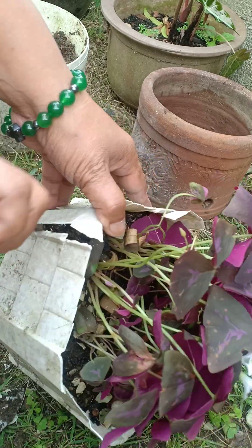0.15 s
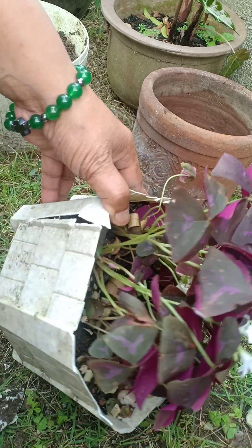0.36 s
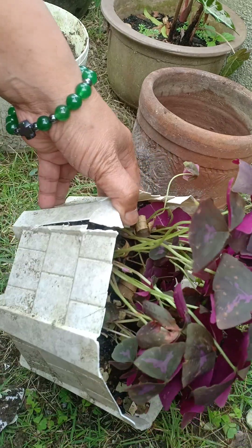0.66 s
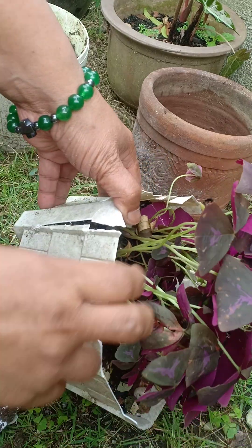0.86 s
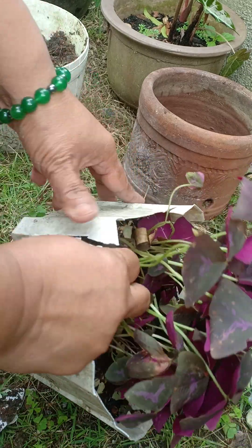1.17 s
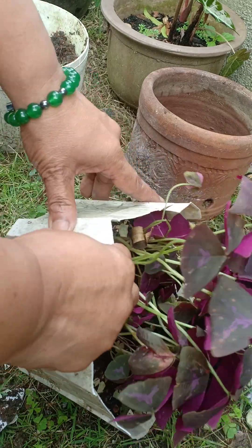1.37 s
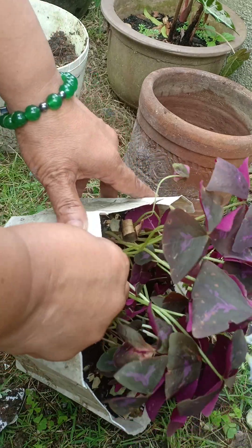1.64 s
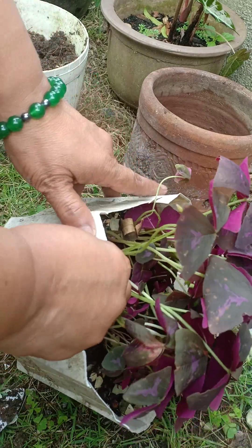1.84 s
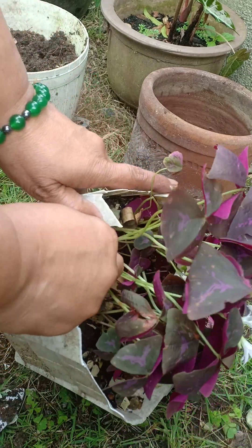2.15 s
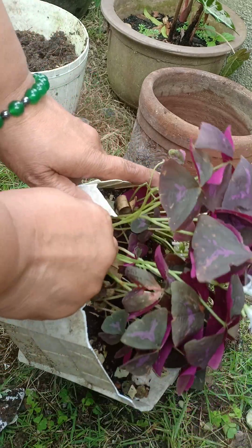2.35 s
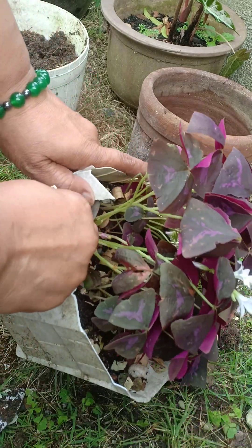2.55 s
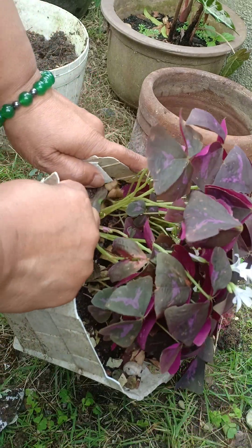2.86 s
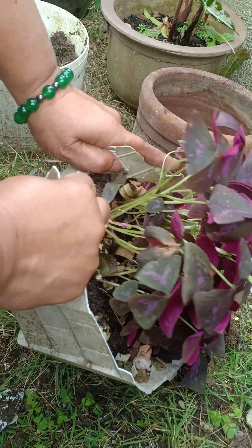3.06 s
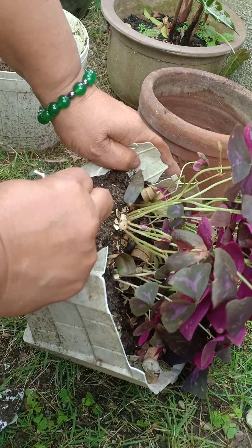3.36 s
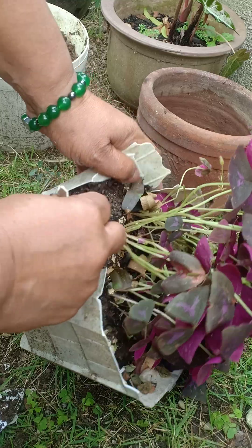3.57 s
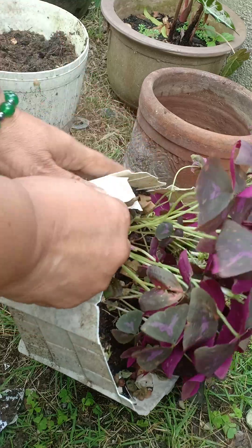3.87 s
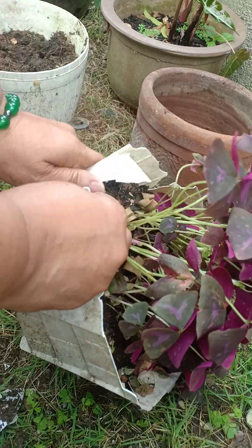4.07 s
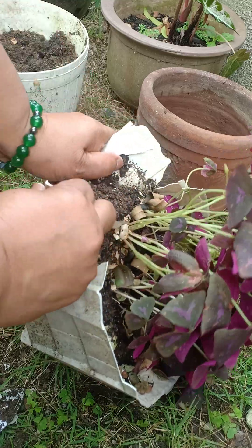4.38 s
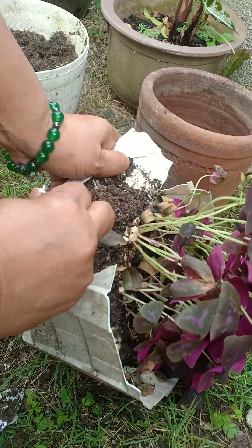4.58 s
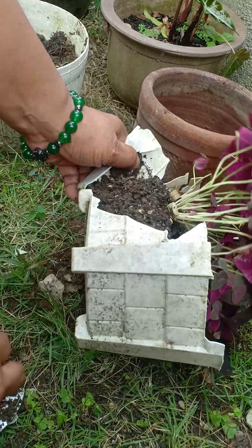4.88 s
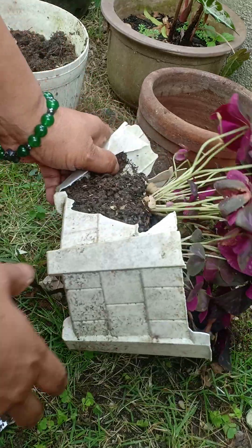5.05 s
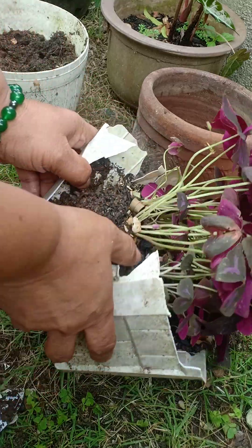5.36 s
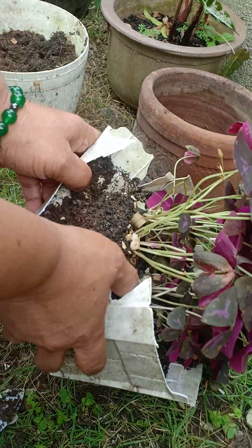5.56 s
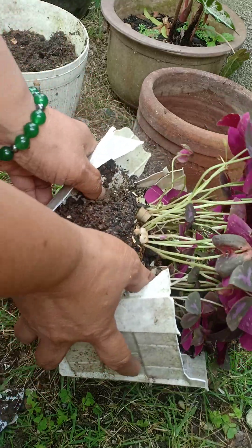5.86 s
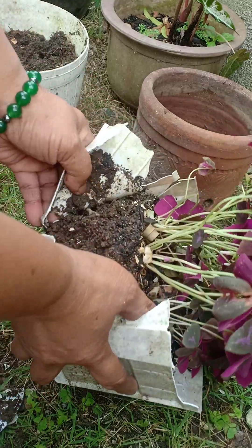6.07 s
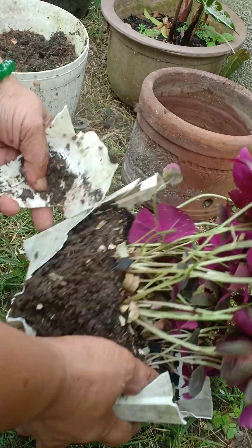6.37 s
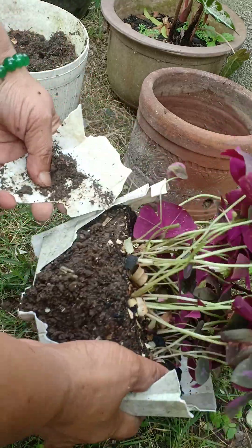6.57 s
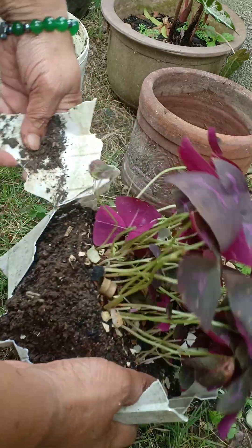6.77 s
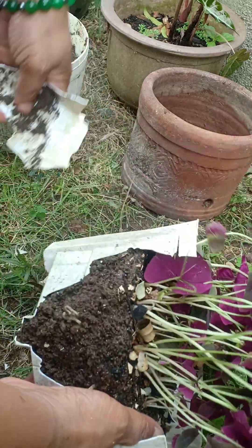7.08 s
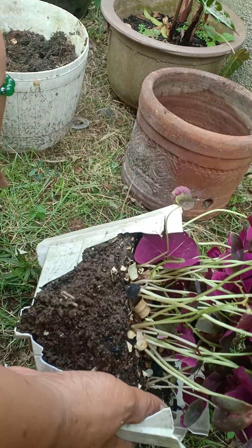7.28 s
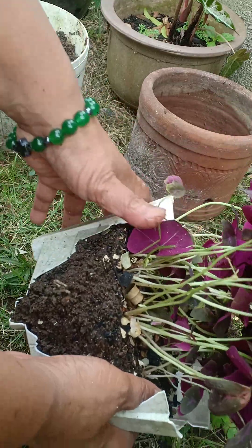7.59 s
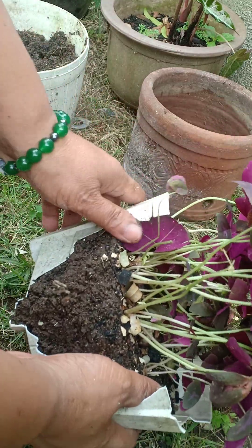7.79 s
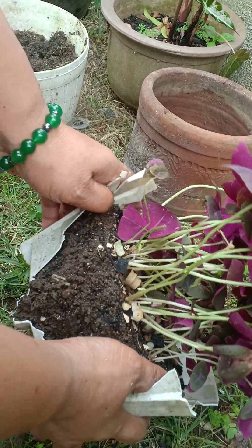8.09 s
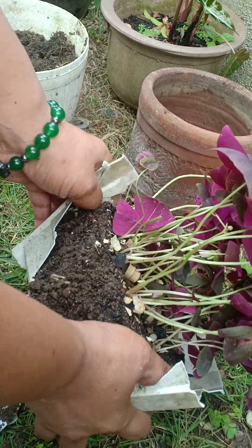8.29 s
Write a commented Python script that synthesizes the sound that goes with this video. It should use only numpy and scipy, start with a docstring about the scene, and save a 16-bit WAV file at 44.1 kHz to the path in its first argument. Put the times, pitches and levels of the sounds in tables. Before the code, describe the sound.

A brittle plastic planter is pulled apart by hand on a lawn, about half a metre from the microphone. Quick runs of small cracks come first, then several loud, sharp snaps through the middle and later part, one a double snap with a low thud. Between them soil and leaves rustle softly and crumbs tick on the plastic. Far off, traffic rumbles and a machine hums steadily.

```python
"""A brittle plastic planter is pulled apart by hand on a lawn, half a metre away, in stereo.
Each fracture, single or in a quick run, releases stored strain as bending waves that the soil damps.
One double snap has a low thud and leaves a rough 5 kHz ringing. Crumbs tick on impact, edges squeak
early on, and edges, soil and leaves rustle. The yard scatters a faint tail; far off, a machine hums and
traffic rumbles. The level dips briefly ahead of two breaks; a limiter ducks around the loudest snaps."""
import sys
import numpy as np
from scipy import signal
from scipy.fft import rfft, irfft
from scipy.io import wavfile
from scipy.ndimage import uniform_filter1d, minimum_filter1d

SR = 44100
rng = np.random.default_rng(int(sys.argv[2]) if len(sys.argv) > 2 else 0)


def output_pcm(signal):
    """Save a mono or channel-first signal as 16-bit PCM at the path in sys.argv[1].

    Samples are clipped to [-1, 1] before scaling.
    """
    pcm = np.clip(np.atleast_2d(signal).T, -1, 1) * 32767
    wavfile.write(sys.argv[1], SR, np.round(pcm).astype(np.int16))


N = 371763

# fractures of the wall: (time [s], strength [dB], resonance of the flexing piece [Hz],
# ring of the fresh edge [Hz], brightness near 5 kHz [dB], left minus right [dB], t60 [s])
CRACKS = [(.033, 0, 1420, 5630, -11, 2, .035), (.054, -7, 900, 5200, 4.5, 0, .014),
          (0.1135, 5, 2100, 5300, -2, 2, 0.034), (0.1262, 11.5, 980, 6000, -6, -0.5, 0.046),
          (0.2935, 10.5, 1940, 1460, -7.5, -2.5, 0.031), (.467, -6.5, 800, 4500, 13.5, 0.5, 0.029),
          (.8085, 7.5, 2220, 4080, 13.5, 6, 0.029), (0.8148, 10.5, 2100, 5760, 1, 3, 0.055),
          (.821, 2, 2000, 5820, 9, -2, 0.04), (.832, 5, 3900, 5340, -5, 2, 0.065),
          (0.841, 7, 2440, 3530, 13.5, 5.5, 0.031), (.922, 7.5, 2500, 4890, 1.5, 4, 0.031),
          (0.9354, -3, 2310, 4860, -1, 23, 0.046), (0.9494, 2, 2110, 4930, 0, 2, 0.029),
          (1.028, -6, 1700, 4800, -7, 8, .02), (1.187, 3, 945, 3920, -7.5, 0, 0.073),
          (1.812, 0, 1310, 4960, -4.5, -2, 0.053), (2.054, 9.5, 1000, 1290, -7.5, 1, 0.023),
          (3.083, 27.5, 1160, 3820, -3.5, 0, 0.015), (3.222, 4, 535, 5610, -9.5, -2, 0.016),
          (3.3379, 15.5, 1290, 2620, 2, .5, 0.012), (3.535, 1, 1960, 5600, 1, 1.5, .011),
          (3.55, 29.5, 1080, 2640, 3.5, 0.5, 0.0071), (3.561, 15, 2920, 2580, 0, -0.5, .026),
          (4.289, -0.5, 1740, 3340, -3, 0, 0.087), (4.303, -8.5, 1750, 4500, 5, 0, 0.027),
          (4.735, 27, 1700, 5370, 3.5, 0.5, 0.024), (4.793, 28, 2750, 2540, 3, 0, 0.017),
          (5.076, 3, 1970, 5080, -6, 0, 0.026), (5.0851, 9, 1830, 5340, 0, 1.5, 0.01),
          (5.159, 5.5, 1720, 5800, -2, -3, 0.013), (5.219, -6.5, 1193, 5630, -4, 0, 0.019),
          (5.305, -1, 2207, 3410, -8, -2.5, 0.031), (5.817, -10, 2400, 3840, 4, 4.5, 0.026),
          (5.986, -10, 2147, 4860, 2, 2, .02), (6.375, 14, 2840, 5200, 6, -6.5, 0.024),
          (6.3894, 17, 2600, 5080, 5, 0.5, 0.029), (6.739, -3.5, 2450, 5500, 1, 4, 0.017),
          (6.819, -1, 1040, 5000, -7.5, 0, .039), (6.9664, 25, 1144, 5570, -4, -2, 0.021),
          (6.977, 15, 1048, 5030, -7, 1, 0.034), (7.088, -2, 890, 3330, -11, 2, .029),
          (7.213, -4, 1870, 3900, -9, -3, 0.026), (7.395, -5, 856, 6400, 1, -2, 0.048),
          (8.216, -12, 1500, 4950, -4, 1.5, .035), (8.412, -12, 2300, 5350, -1.5, 0, .02)]
# response of the thin wall to a fracture: (frequency [Hz], gain [dB])
WALL_COLOUR = [(60, -29), (180, -24.5), (280, -9), (450, -5), (700, -9), (1300, -13), (2600, -6),
               (3700, -11.5), (5500, -8), (6400, -12), (7300, -19.5), (9000, -25), (15500, -24)]
# modes of the wall, damped by the soil: (frequency [Hz], relative level [dB], t60 [s])
WALL_MODES = [(286, -3, 0.058), (459, -2.5, 0.032), (888, 5.5, 0.01), (1190, 4.5, 0.025), (1623, 3, .022),
              (2593, 5.5, 0.012), (3660, 2.5, .018), (4940, 8, .016), (5636, 7, 0.0164)]
# chips and soil striking the plastic: (time [s], strength [dB], pitch [Hz], left minus right [dB])
CRUMBS = [(.028, -17, 2520, 4), (.09, -20, 5500, -1), (.142, -28, 1690, -2), (.47, -20, 1800, -1),
          (.872, -23, 4500, 5), (3.041, -21.5, 5400, 0), (3.405, -25, 5430, 2), (3.801, -20, 2230, -2),
          (4.094, -22.5, 1906, -2), (4.558, -23, 5550, 0), (4.685, -18, 5600, -2), (4.931, -14, 1620, 3),
          (4.938, -15, 2220, 2), (4.974, -17, 2750, -5), (5, -12, 2040, 1), (5.021, -13, 2100, 1),
          (5.031, -15.5, 5200, 2), (5.057, -24, 2270, -2), (5.114, -18, 5190, 2), (5.126, -13, 2180, 1),
          (5.183, -22.5, 5400, 4), (5.875, -25, 5660, 1), (5.931, -31, 2203, -12), (6.606, -20.5, 2016, 9),
          (6.62, -15.5, 4880, -2), (6.66, -22, 4830, 2), (6.728, -24, 2180, 0), (6.81, -21, 2520, -4),
          (6.853, -22, 5180, -4), (6.897, -14.5, 1620, -2), (7.995, -22, 2430, -1.5),
          (8.109, -26.5, 5000, -3), (8.12, -30, 5200, -3), (8.156, -28, 5200, 0)]
# response of the plastic to a crumb: (frequency [Hz], gain [dB])
CRUMB_COLOUR = [(200, -12.5), (800, -3.5), (1600, 7), (3700, -1), (5500, -7), (7500, -12), (10000, -20.5),
                (15500, -17.5)]
# three squeaks of edge on edge, then at 6.395 s the rough 5 kHz ringing after the double snap:
# (start [s], length [s], pitch [Hz], level [dB], frequency jitter [ratio])
ROUGH_TONES = [(.631, .012, 4810, -51.5, .05), (.978, .014, 4830, -55, .05), (.998, .014, 4780, -55, .05),
               (6.395, .1, 5100, -58, 0.17)]
# rustles of edges, soil and leaves, except the row at 6.373 s, the low thud of the snap at 6.375 s:
# (start [s], length [s], level [dB], tilt [dB/octave], body at 600 Hz [dB], fizz [dB])
GRAINY_BURSTS = [(0, 0.35, -56.5, -4.5, 5, -4), (.847, .19, -54, 7, -2, -5), (1.26, 0.086, -57, 1, 0, -1),
                 (1.41, 0.097, -56.5, 0.5, 0, 3.5), (1.53, .06, -63, 3, 0, -1),
                 (2.827, 0.055, -56, 3, -9, 3.5), (3.102, 0.084, -52, -2.5, -1, 0),
                 (3.684, 0.086, -57, -2, 0, -2), (3.795, 0.14, -58.5, 0, 3.5, 9),
                 (3.941, 0.14, -63.5, 3, 1, 4), (4.211, 0.066, -57, 0, 3.5, -3.5),
                 (4.362, .06, -61, 6, 3.5, -0.5), (4.815, 0.16, -54.5, 1, 5, 2.5),
                 (4.924, 0.16, -43, -1, 0, 0), (5.089, 0.21, -57.5, 0, -2, 4), (5.758, .18, -50, 0, 26, 0),
                 (5.977, .1, -62.5, 4, 0, -2), (6.373, 0.032, -39.5, -4.5, 22, 0),
                 (6.39, 0.094, -47, 0, -3, -3), (6.458, .13, -54, 0, 7, -3),
                 (6.557, 0.4, -60.5, 2.5, 10, 1), (7.033, 0.25, -58.5, -2, 1, 6),
                 (7.976, 0.18, -73, 3, 6.5, 9), (8.3, 0.23, -64.5, 3.5, 0, 3)]
# spectral envelope of those bursts: (frequency [Hz], gain [dB])
BURST_COLOUR = [(100, -22), (400, -11.5), (1100, -4), (2000, 8.5), (2800, 4.5), (3700, -2), (5400, 4.5),
                (7500, -13), (9500, -22), (15500, -14.5)]
# reverberation time of the yard: (frequency [Hz], t60 [s])
YARD_DECAY = [(200, 0.21), (1000, 1), (2500, 0.35), (5500, 0.44), (9000, 0.42), (14000, 0.99)]
# partials of the machine: (frequency [Hz], level [dB])
HUM_PARTIALS = [(62.5, -65.5), (125, -55), (283, -60), (371.5, -57.5), (500, -67.5)]
# notes of far engines: (start [s], length [s], pitch [Hz], level [dB])
ENGINE_DRONES = [(0, .95, 127, -44), (.2, .5, 285, -50), (1.6, .55, 125, -43), (2, .6, 153, -36.5),
                 (3.2, 1.5, 147, -45), (7.05, 1.4, 127, -45)]
# spectrum of the far traffic: (frequency [Hz], relative density [dB])
TRAFFIC_COLOUR = [(25, -27), (36, -16.5), (50, -20.5), (68, -1), (95, -8), (125, 5), (160, 0.5), (220, -9),
                  (320, -9.5), (430, -16), (800, -20), (1400, -26), (2650, -24), (3700, -38), (5500, -33),
                  (7500, -50), (10000, -56), (15500, -52.5)]
# likeness of the traffic in the two channels: (frequency [Hz], correlation [0-1])
TRAFFIC_COHERENCE = [(60, 0.96), (160, 0.99), (300, 0.85), (600, 0.58), (1200, 0), (3000, 0.04), (15000, 0)]
# course of the traffic's hiss: (time [s], level [dB])
HISS_LEVELS = [(0, -47.5), (.6, -49.5), (2.3, -50), (2.75, -50.5), (3.3, -50), (4.5, -51), (5.5, -53),
               (6.1, -51), (7.8, -53.5), (8.4, -53)]
# brief dips of the whole sound: (start [s], end [s], gain [dB])
DIPS = [(4.705, 4.737, -11.5), (6.348, 6.376, -11.5)]


def crack(strength_db, piece_hz, edge_hz, bright_db, pan_db, t60, gentle_below_db=17.5, large_hz=1020):
    """Brittle fracture: piece and edge resonate; a small piece that yields gently radiates less bass."""
    gentle = np.clip(2 - strength_db / gentle_below_db, 0, 1)
    octaves_smaller = np.clip(np.log2(piece_hz / large_hz), -0.3, 1)
    body_db = -0.5 - 5.5 * gentle * octaves_smaller
    fizz_db = -8 + 1.23 * bright_db + 5 * gentle
    tone = [(650, body_db), (1400, 0.0032), (2800, 0.0083),
            (4600, bright_db), (6500, bright_db), (9000, fizz_db)]

    def gain_db(hz):
        piece = resonance(hz, piece_hz, db=4.5 + 3.5 * gentle, octaves=0.55)
        edge = resonance(hz, edge_hz, db=6, octaves=0.063)
        return curve(WALL_COLOUR, hz) + curve(tone, hz) + piece + edge

    return coloured(wall_waves(t60), gain_db) * panned(strength_db, pan_db)


def wall_waves(t60, attack_s=0.00028, after_db=-20, after_t60=0.074):
    """Impulse response of a damped shell: a sharp front, scattered bending waves and ringing modes."""
    t = np.arange(4096) / SR
    front = np.zeros((2, len(t)))
    front[0, 12] = front[1, 7] = 1  # reaches the right channel first
    rise = 1 - np.exp(-t / attack_s)
    decay = amp(-60 * t / t60) + amp(after_db - 60 * t / after_t60)
    detune = rng.uniform(0.97, 1.02)  # every break leaves a wall of another size
    modes = np.zeros_like(front)
    for hz, db, mode_t60 in WALL_MODES:
        phase = rng.random((2, 1)) * min(hz / 2500, 1)
        modes += amp(db - 60 * t / mode_t60) * np.sin(2 * np.pi * (hz * detune * t + phase))
    return unit_energy(0.14 * front + scattered(rise * decay) + 0.27 * unit_energy(modes))


def scattered(envelope):
    """Diffuse field: waves from all sides, even in spectrum; long ones reach both channels alike."""
    n = len(envelope)
    left, right = rng.standard_normal((2, n)) * envelope
    side = signal.sosfilt(signal.butter(1, 800, "high", fs=SR, output="sos"), left - right)
    burst = np.array([left + right + side, left + right - side])
    power = (abs(rfft(burst)) ** 2).mean(0)
    band_db = 10 * np.log10(uniform_filter1d(power, size=41))
    whitened = coloured(burst, lambda hz: -np.interp(hz, np.fft.rfftfreq(n, 1 / SR), band_db))
    return unit_energy(whitened[:, :n])


def crumb(strength_db, pitch_hz, pan_db, t60=0.033):
    """Impact excitation: a chip or soil grain taps the plastic, which rings briefly around one pitch."""
    t = np.arange(1024) / SR
    tap = rng.standard_normal((2, len(t))) * amp(-60 * t / t60)
    gain_db = lambda hz: curve(CRUMB_COLOUR, hz) + resonance(hz, pitch_hz, db=13, octaves=0.36)
    return unit_energy(coloured(tap, gain_db, size=512)) * panned(strength_db, pan_db)


def loose_crumb(typical_db, typical_hz=3460, spread_db=2.5):
    """Random impact: force, pitch and place scatter about typical values."""
    force, octaves, side = np.clip(rng.standard_normal(size=3), -2, 2)
    pitch_hz = typical_hz * 2 ** (0.95 * min(octaves, 1))
    return crumb(typical_db + spread_db * force, pitch_hz, pan_db=2.5 * side)


def falling_crumbs(per_s=18, hard_crack_db=14.5, mean_delay_s=0.045, fade_db_per_s=79):
    """Random arrivals: crumbs fall during each grainy burst and in a fading shower after a hard crack."""
    out = np.zeros((2, N))
    for start, length, level_db, *_ in GRAINY_BURSTS:
        typical_db = -32 + 0.53 * (level_db + 61)  # louder bursts bring louder ticks
        for moment in rng.random(size=round(per_s * length)):
            add(out, start + moment * length, loose_crumb(typical_db))
    for start, strength_db, *_ in CRACKS:
        if strength_db > hard_crack_db:
            for delay in mean_delay_s * rng.exponential(size=10):
                add(out, start + delay, loose_crumb(strength_db - 50 - fade_db_per_s * delay))
    return out


def rough_tone(length, hz, level_db, jitter):
    """Line broadening: frequency jitter roughens a sine into a squeak or the ringing after a snap."""
    n = int(length * SR)
    cycles = np.cumsum(hz * (1 + jitter * rng.standard_normal(n))) / SR
    tone = np.sin(2 * np.pi * cycles) * signal.windows.hann(n)
    return unit_rms(tone) * panned(level_db, 0)


def grainy_burst(length, level_db, tilt_db, body_db, fizz_db, grains_per_s=1200, ring_cycles=2.5):
    """Shot noise: clumps of ringing grains over hiss make a rustle or, if short and low, a thud."""
    n, t = int(length * SR), np.arange(512) / SR
    pitches = np.linspace(1200, 13000, num=14)
    grains = np.zeros((2, n))
    for hz in pitches:
        onsets = rng.random(n) < grains_per_s / len(pitches) / SR
        forces = amp(3.5 * np.minimum(rng.exponential(1, n), 3))
        decay = np.sqrt(hz) * np.exp(-hz * t / ring_cycles)
        ring = decay * np.sin(2 * np.pi * (hz * t + rng.random((2, 1))))
        grains += signal.fftconvolve((onsets * forces)[None], ring, axes=1)[:, :n]
    slow_noise = unit_rms(uniform_filter1d(rng.standard_normal(n), size=300, mode="wrap"))
    clumps = amp(2.5 * np.clip(slow_noise, -2, 2))
    hiss = rng.standard_normal((2, n))
    burst = clumps * (unit_rms(grains) + hiss) * signal.windows.tukey(n, 0.4)

    def gain_db(hz):
        body = resonance(hz, 600, db=body_db, octaves=1)
        fizz = curve([(6000, 0.0011), (10000, fizz_db)], hz)
        tilt = tilt_db * np.log2(np.clip(hz, 400, 8000) / 2500)
        return curve(BURST_COLOUR, hz) + body + fizz + tilt

    return amp(level_db) * unit_rms(coloured(burst, gain_db))


def yard_tail(sound, wet_db=-24, build_s=0.0017):
    """Reverberation: pots and walls scatter the sound, and each band decays at its own rate."""
    hz, t, bands = signal.stft(rng.standard_normal((2, SR)), SR, nperseg=256)
    bands = bands * amp(-60 * t / curve(YARD_DECAY, hz)[:, None]) * (1 - np.exp(-t / build_s))
    response = unit_energy(signal.istft(bands, SR, nperseg=256)[1])
    return amp(wet_db) * signal.fftconvolve(sound, response, axes=1)[:, :N]


def machine_hum(waver_db=2):
    """Periodic vibration: a machine radiates a line spectrum, wavering in level and pitch."""
    return sum(amp(db + waver_db * drift(2.3)) * wandering_tone(hz, depth=0.0019, rate_hz=2.4)
               for hz, db in HUM_PARTIALS)


def engine_drones():
    """Periodic vibration: each far engine is heard as one note that swells and fades."""
    t, out = np.arange(N) / SR, np.zeros(N)
    for start, length, hz, db in ENGINE_DRONES:
        progress = np.clip((t - start) / length, 0, 1)
        swell = np.sqrt(abs(np.sin(np.pi * progress)))
        out += amp(db) * swell * wandering_tone(hz, depth=0.006, rate_hz=3)
    return out


def traffic(rumble_db=-38.5, recede_db_per_s=0.51, crossover_hz=450):
    """Partial coherence: a slowly receding rumble is alike in both channels; the hiss is diffuse."""
    t, hz = np.arange(N) / SR, np.fft.rfftfreq(N, 1 / SR)
    left, independent = rfft(rng.standard_normal((2, N)))
    coherence = curve(TRAFFIC_COHERENCE, hz)
    right = coherence * left + np.sqrt(1 - coherence ** 2) * independent
    spectrum = np.array([left, right]) * amp(curve(TRAFFIC_COLOUR, hz))
    low_share = 1 / (1 + (hz / crossover_hz) ** 4)
    rumble = unit_rms(irfft(spectrum * low_share, N))
    hiss = unit_rms(irfft(spectrum * (1 - low_share), N))
    rumble *= amp(rumble_db - recede_db_per_s * t + 0.98 * drift(8.2))
    hiss *= amp(np.interp(t, *np.transpose(HISS_LEVELS)) + 0.76 * drift(24))
    return rumble + hiss


def dips(ramp_s=0.0057):
    """Amplitude modulation: a gain that sinks for a moment and comes back."""
    t = np.arange(N) / SR
    return amp(sum(db * np.clip(np.minimum(t - start, end - t) / ramp_s, 0, 1)
                   for start, end, db in DIPS))


def amp(db):
    return 10 ** (np.asarray(db) / 20)


def panned(db, pan_db):
    return amp([[db + pan_db / 2], [db - pan_db / 2]])


def unit_rms(x):
    return x / np.sqrt(np.mean(x ** 2) + 1e-20)


def unit_energy(x):
    return x / np.sqrt(np.sum(x ** 2, axis=-1, keepdims=True) + 1e-20)


def curve(points, hz):
    """Linear interpolation of (frequency [Hz], value) points on a log-frequency axis."""
    point_hz, value = np.transpose(points)
    return np.interp(np.log(hz + 1), np.log(point_hz + 1), value)


def resonance(hz, centre_hz, db, octaves):
    """Resonance peak in dB, bell-shaped on a log-frequency axis."""
    return db * np.exp(-(np.log2((hz + 1) / centre_hz) / octaves) ** 2)


def coloured(x, gain_db, size=2048):
    """Minimum-phase filtering by gain_db(hz): nothing sounds ahead of a click."""
    log_gain = np.log(amp(gain_db(abs(np.fft.fftfreq(size, 1 / SR)))))
    taps = np.fft.ifft(np.exp(np.conj(signal.hilbert(log_gain)))).real
    return signal.fftconvolve(x, taps[None, :size // 2], axes=1)


def drift(rate_hz):
    """Random fluctuation of unit rms whose spectrum peaks at rate_hz."""
    speed = np.fft.rfftfreq(N, 1 / SR) / rate_hz
    return unit_rms(irfft(rfft(rng.standard_normal(N)) * speed * np.exp(-speed), N))


def wandering_tone(hz, depth, rate_hz):
    """Random frequency modulation of a sine of unit rms."""
    cycles = np.cumsum(hz * (1 + depth * drift(rate_hz))) / SR
    return np.sqrt(2) * np.sin(2 * np.pi * cycles)


def add(mix, start_s, sound):
    """Superposition of a stereo sound on the mix from start_s."""
    part = mix[:, round(start_s * SR):][:, :sound.shape[1]]
    part += sound[:, :part.shape[1]]


def scene():
    """Superposition: the planter, its reverberation and the far background, dipping together."""
    far = traffic() + (machine_hum() + engine_drones())
    planter = np.zeros((2, N))
    for table, source in ((CRACKS, crack), (CRUMBS, crumb),
                          (ROUGH_TONES, rough_tone), (GRAINY_BURSTS, grainy_burst)):
        for start, *row in table:
            add(planter, start, source(*row))
    planter += falling_crumbs()
    return (planter + yard_tail(planter) + far) * dips()


def record(dry, threshold_db=-11, slope=0.35, recovery_db_per_s=350, ceiling=1.17, cutoff_hz=15950):
    """Dynamic compression: a look-ahead limiter, then soft saturation and a low-pass filter."""
    power_db = 10 * np.log10(abs(uniform_filter1d((dry ** 2).mean(0), size=110)) + 1e-12)
    cut_db = slope * np.maximum(power_db - threshold_db, 0)
    cut_db = -minimum_filter1d(-cut_db, size=900, origin=-449)  # deepest cut of the next 20 ms
    recovery_db = np.arange(N) * recovery_db_per_s / SR
    cut_db = np.maximum.accumulate(cut_db + recovery_db) - recovery_db
    gain = amp(-uniform_filter1d(cut_db, size=300))
    saturated = ceiling * np.tanh(dry * gain / ceiling)
    low_pass = signal.firwin(255, cutoff_hz, window=("kaiser", 8), fs=SR)
    return signal.oaconvolve(saturated, low_pass[None], "same")


dry = scene()
out = record(dry)
output_pcm(out)
```